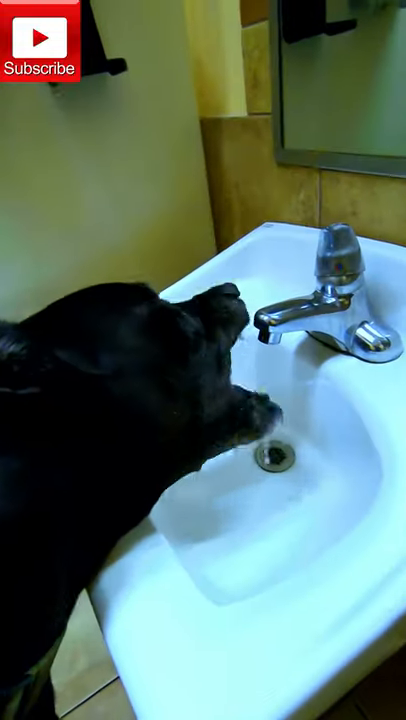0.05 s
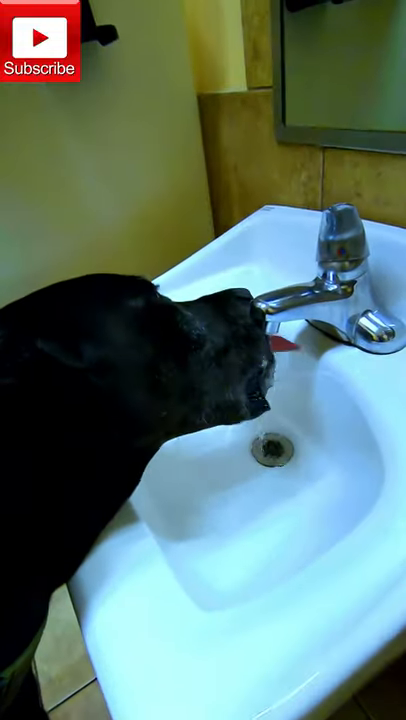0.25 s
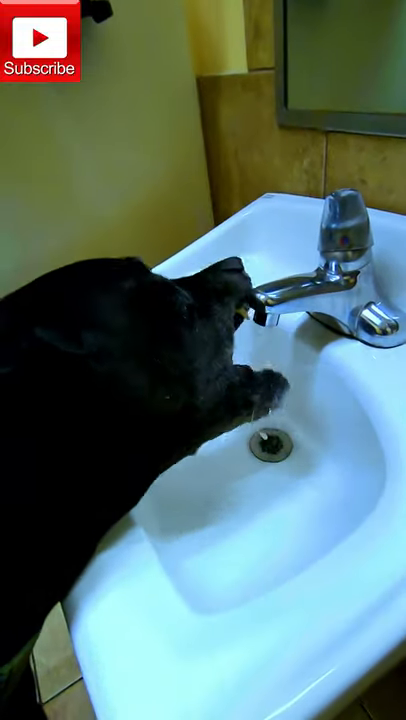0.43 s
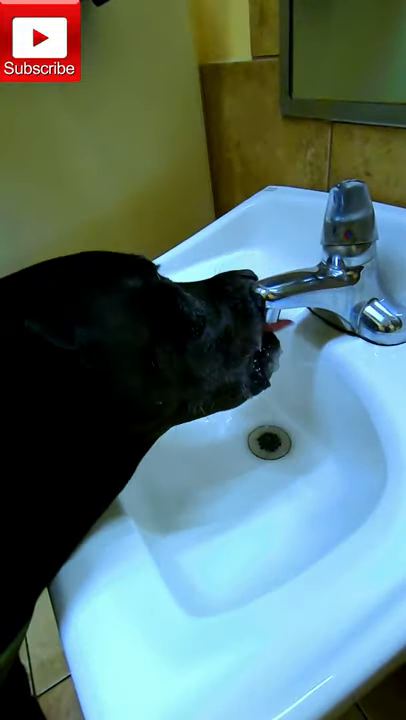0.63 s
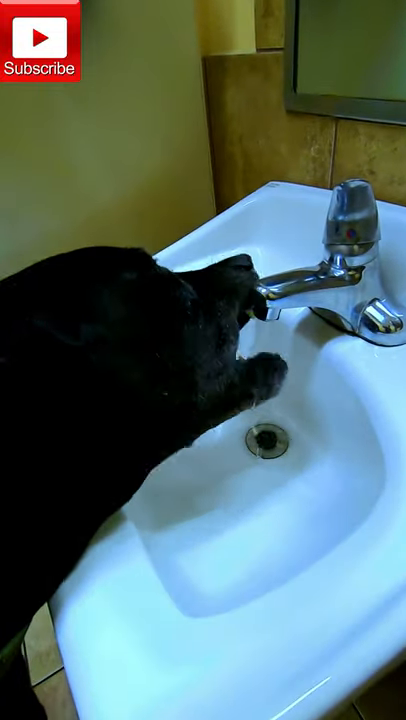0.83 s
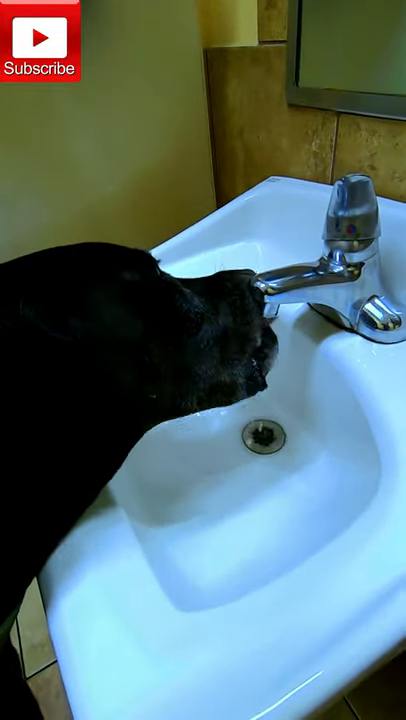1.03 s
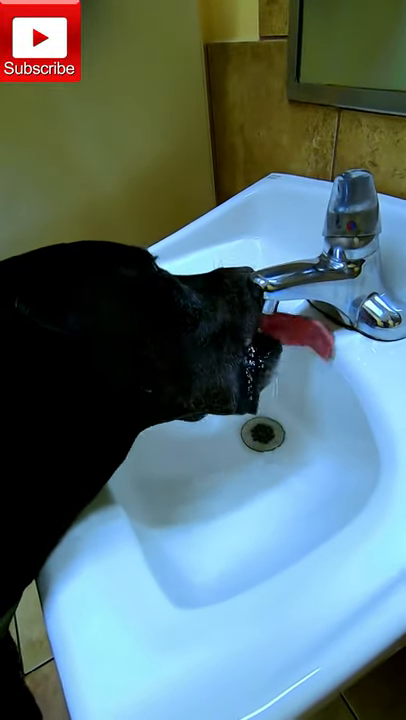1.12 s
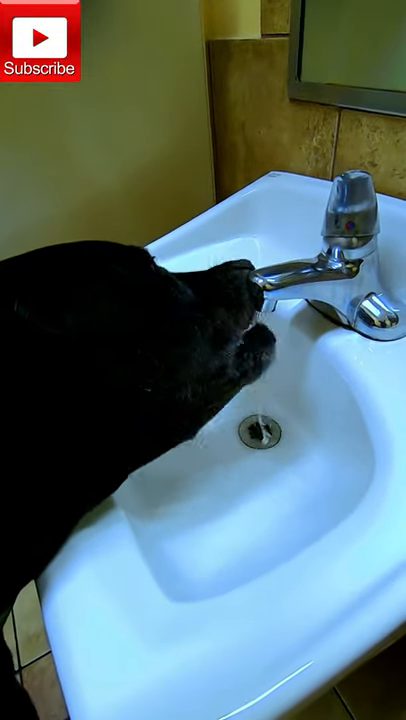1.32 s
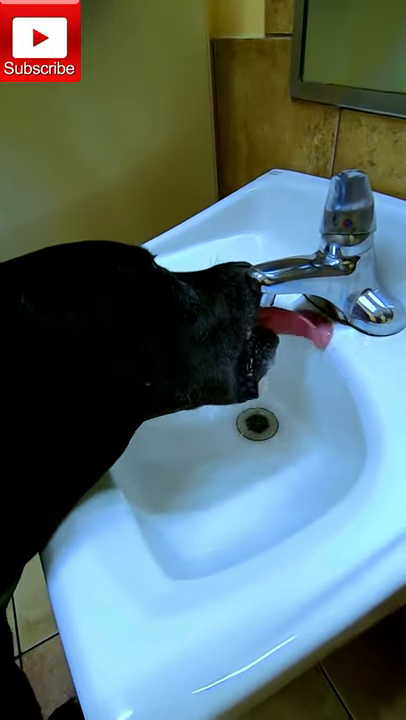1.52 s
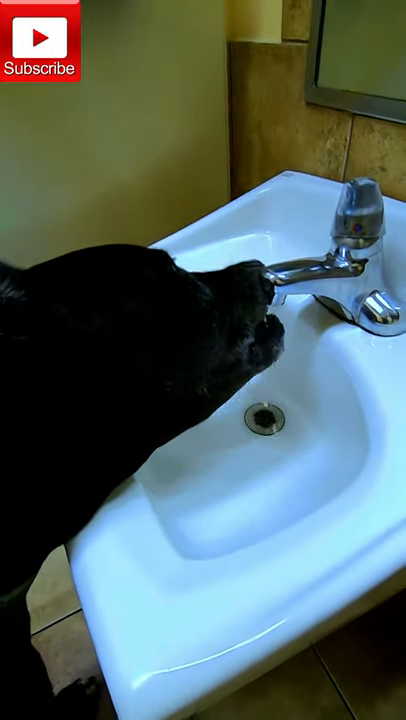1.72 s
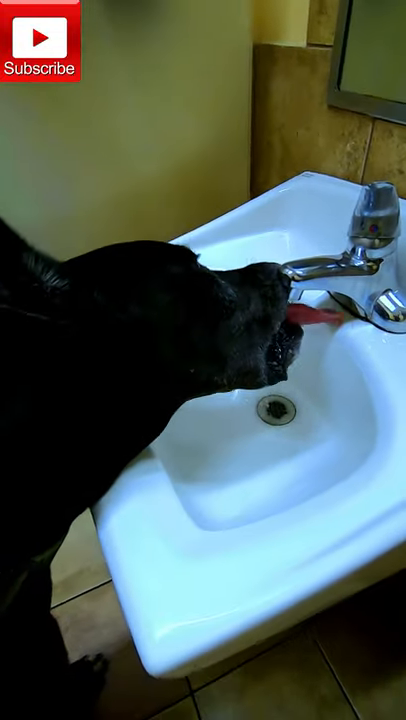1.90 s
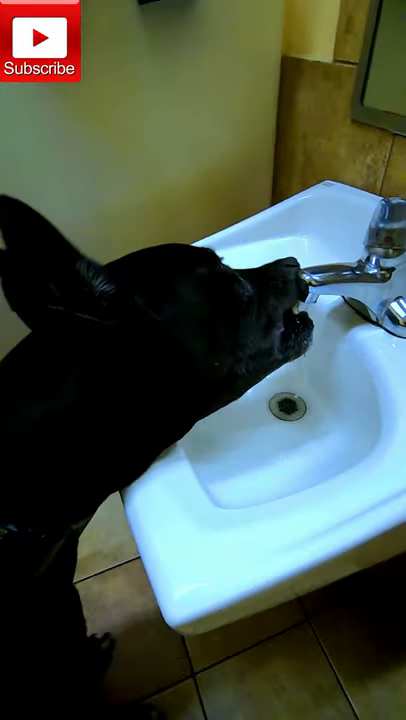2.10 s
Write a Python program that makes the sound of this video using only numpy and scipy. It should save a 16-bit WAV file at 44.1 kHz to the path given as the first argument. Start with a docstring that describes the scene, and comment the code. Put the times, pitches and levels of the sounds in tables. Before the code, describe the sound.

Close, wet lapping as a dog drinks at a sink: five quick slurps with tongue smacks, crackling bubbles and one hollow gulp early on. The basin and tiled bathroom ring briefly over a faint low hum.

```python
"""A dog lapping at a washbasin

A dog laps five times from a faucet in a small tiled bathroom. In each lap the tongue breaks the
water into a fizzy spray while tiny bubbles crackle in the mouth. Tongue and lips smack, larger
bubbles pop, the jaw knocks softly, and the second lap has a hollow gulp.
The basin and the room ring after these sounds, over a low drone and faint airy noise."""
import sys
import numpy as np
from scipy import signal
from scipy.fft import rfft, irfft
from scipy.io import wavfile

SR = 44100
rng = np.random.default_rng(int(sys.argv[2]) if len(sys.argv) > 2 else 0)


def waveform_to_disk(signal):
    """Save audio, clipped to [-1, 1], as 16-bit WAV at the path in sys.argv[1]."""
    frames = np.transpose(np.atleast_2d(signal))
    scaled = np.clip(frames, -1, 1) * 32767
    samples = np.round(scaled).astype(np.int16)
    wavfile.write(sys.argv[1], SR, samples)


N = 94815
TIME = np.arange(N) / SR

# tone of the steady background noise: pitch_hz, gain_db
AIR_TONE = [(25, -6), (60, -1), (150, -9.5), (300, -9), (600, 8), (1200, -12), (3000, -11.5), (6000, -18),
            (9000, -18), (15000, -19)]
# low notes the room drones on: pitch_hz, width_hz, level_db
DRONE_NOTES = [(125.5, 12.7, -10), (155.6, 8.9, -13), (186.3, 5.9, -5), (208.4, 31.6, -3), (241.7, 7.3, -7),
               (313.3, 20, -13), (356.8, 13.3, -12.5), (411.2, 12, -15)]
# how the drone grows and fades: time_s, gain_db
DRONE_LOUDNESS = [(0.0, -65.5), (0.29, -47.5), (0.5, -54), (0.63, -42.5), (0.8, -47.5), (0.82, -50.5),
                  (1.3, -44.5), (1.51, -57.5), (1.92, -50), (2.11, -58.5), (2.15, -51.5)]
# deeper notes that make a rumble: pitch_hz, width_hz, level_db
RUMBLE_NOTES = [(38, 15, -6), (58, 14, -1), (83, 48, -14.5), (119.8, 9.8, 4)]
# how the rumble grows and fades: time_s, gain_db
RUMBLE_LOUDNESS = [(0, -63.5), (.15, -88.5), (.3, -63.5), (.6, -60), (.86, -62.5), (0.969, -59.5),
                   (1.15, -55), (1.33, -49.5), (1.55, -61.5), (1.85, -55.5), (1.97, -65.5), (2.15, -63)]
# time the room's echo takes to fade by 60 dB: pitch_hz, fade_s
ECHO_FADE = [(150, 0.32), (400, 0.34), (1000, 0.67), (3000, 0.29), (7000, 0.2), (14000, 0.44)]
# tone of that echo: pitch_hz, gain_db
ECHO_TONE = [(150, -11), (400, -2.5), (1000, -1), (2000, 0), (3000, 2), (5000, -3.5), (8000, 2),
             (14000, -1)]
# how much echo and air spread out to left and right: pitch_hz, gain_db
STEREO_SPREAD = [(150, -65), (350, -43), (1500, -50), (3000, -46.5), (6000, -27), (10000, -23),
                 (13000, -1.5)]
# notes the basin rings at: pitch_hz, width_hz, gain_db
BASIN_NOTES = [(374, 33, 4), (417, 4, 9.5), (508, 6.7, 10), (711, 24, -14), (1174, 17, 11.5), (1310, 23, 7),
               (1408, 41, 2), (1433, 31, -3), (2547, 60, -2), (2880, 75, -3), (2950, 52, 4.5)]
# larger bubbles: start_s, peak_db, pitch_hz, decay_s
BUBBLE_POPS = [(0.188, -40, 4430, 0.0025), (0.308, -40, 2472, 0.0038), (0.5312, -32.5, 4460, 0.0023),
               (.585, -39.5, 1992, 0.008), (.675, -34.5, 2040, 0.0048), (0.9357, -31.5, 2616, 0.015),
               (0.955, -33, 3290, 0.0022), (1.0008, -29, 1320, 0.0066), (1.0064, -27.5, 1430, 0.0036),
               (1.0128, -34.5, 1416, 0.0055), (1.038, -36.5, 1400, 0.0031), (1.203, -34, 2984, 0.0079),
               (1.2862, -41.5, 2620, 0.0014), (1.4081, -26.5, 1885, 0.0028), (1.424, -31, 2950, 0.0017),
               (1.435, -35.5, 1192, 0.0082), (1.5537, -26.5, 2995, 0.00081), (1.608, -37.5, 2930, 0.0024),
               (1.6521, -48, 2950, 0.0021), (1.808, -44.5, 1153, 0.0038), (1.86, -39, 2203, 0.0047)]
# notes of the hollow mouth in the gulp: pitch_hz, peak_db, decay_s
GULP_NOTES = [(374, -43, 0.038), (444, -41, 0.037), (535, -38, .035), (575, -36.5, 0.026),
              (763, -30.5, 0.041)]
# knocks of jaw and jowls: start_s, peak_db, pitch_hz, width_octaves, decay_s
JAW_KNOCKS = [(.273, -36, 229, 1.1, 0.0033), (.29, -47.5, 683, 0.76, 0.056), (.581, -43, 494, 1, 0.0042),
              (.596, -25, 504, 1.33, 0.0085), (.645, -45, 187, 0.7, 0.013), (.686, -45, 200, 0.55, 0.0045),
              (.701, -34, 443, 2.45, 0.017), (.985, -36, 604, 1.1, 0.017), (1.197, -33, 480, 1.41, 0.014),
              (1.310, -35.5, 182.4, 0.57, 0.0043)]
# smacks of tongue, lips and spattering water: start_s, peak_db, pitch_hz, width_octaves, decay_s
WET_SMACKS = [(.001, -56, 1100, 1.55, 0.025), (.007, -44, 7800, .25, 0.0013),
              (.054, -53, 8700, 0.19, 0.0015), (.129, -51, 4580, 0.36, 0.012),
              (.187, -42.5, 3380, 0.51, 0.0041), (.194, -38, 5470, 0.73, 0.0026),
              (.2045, -28, 3110, 0.38, 0.0073), (.207, -28, 1130, 1.62, .011),
              (.2095, -28.5, 6140, 0.35, 0.0022), (.336, -35.5, 5800, 0.39, 0.0053),
              (.333, -40.5, 1620, 1, 0.017), (.484, -43.5, 4070, 0.92, 0.009), (.524, -49, 7500, 1, .02),
              (.583, -26, 3960, 1.4, 0.0025), (.5975, -21, 3070, 2.1, 0.003),
              (.605, -26, 1080, 1.95, 0.006), (.699, -29, 3560, 0.69, 0.0024),
              (.739, -37.5, 2020, 2, 0.0027), (.747, -40.5, 1574, 0.38, 0.029),
              (.7985, -29.5, 3290, 0.67, 0.0022), (.856, -51, 4200, 0.3, 0.0031),
              (.9075, -36.5, 3550, 1.5, 0.0059), (.934, -24, 4630, 1.45, 0.0039),
              (.959, -38, 4640, 0.39, 0.0017), (.968, -28.5, 1670, 1.73, 0.0057),
              (.9838, -14, 1950, 1.37, 0.001), (1.081, -28, 3700, 0.61, 0.0036),
              (1.118, -23.5, 2250, 1.2, 0.0012), (1.1265, -23.5, 2870, 1.26, 0.0045),
              (1.189, -29, 1480, 2.62, 0.0087), (1.213, -33.5, 4340, 0.32, 0.0043),
              (1.221, -22.5, 3800, 0.92, 0.00097), (1.2215, -30.5, 8900, 0.87, 0.0019),
              (1.304, -43.5, 2870, 0.66, 0.0025), (1.3425, -31.5, 7530, 0.33, 0.0044),
              (1.355, -39, 3100, 2.6, 0.0089), (1.396, -37.5, 5000, 0.29, 0.005),
              (1.430, -28.5, 4900, 1.47, 0.0039), (1.432, -27.5, 2120, 1.33, 0.0087),
              (1.497, -36, 2520, 1.96, 0.009), (1.5615, -28.5, 8220, 1.3, 0.0019),
              (1.591, -36.5, 3350, 1.2, 0.0035), (1.609, -36.5, 3500, 0.83, 0.0027),
              (1.764, -43, 1370, 2.55, 0.048), (1.8045, -34.5, 2970, 1.4, 0.0097),
              (1.829, -37, 2980, 0.33, 0.016), (1.8805, -33.5, 5940, 0.64, 0.0025),
              (1.964, -31.5, 3250, 0.95, 0.0036), (2.031, -50, 2880, 0.44, 0.0026),
              (2.1425, -37.5, 3270, 0.62, 0.0014)]
# strength of the tiny mouth bubbles by pitch: pitch_hz, gain_db
SQUELCH_TONE = [(400, -18.5), (800, -4.5), (1300, -6), (2000, -2), (3000, -6.5), (4500, 0.5), (6000, -1),
                (9000, -31)]
# laps of the tongue (mist is measured against the spray):
# peak_s, squelch_db, spray_db, spray_early_s, spray_hz, squelch_decay_s, mist_db
TONGUE_LAPS = [(0.212, -48, -50, 0.015, 5650, 0.075, -15), (0.602, -45.5, -45, 0.08, 8060, 0.09, -9.5),
               (0.983, -41.5, -48, 0.047, 6640, 0.12, 7), (1.433, -46, -50, 0.09, 7400, 0.055, -4),
               (1.828, -54.5, -52, 0.013, 6500, 0.16, -5)]
# how the microphone dulls the high pitches: pitch_hz, gain_db
MICROPHONE_TONE = [(30, -1.5), (4000, -1.5), (7000, -7), (10000, -2.5), (11500, -13), (14000, -10.5),
                   (16000, -24)]


def from_db(db):
    """Turn decibels into a number to multiply by."""
    return 10 ** (np.asarray(db) / 20)


def rms_one(x):
    """Scale a sound to an average (RMS) strength of 1."""
    return x / np.sqrt(np.mean(x ** 2) + 1e-20)


def at_hz(points, hz):
    """Read between the rows of a table, with octaves evenly spaced."""
    pitches, values = np.transpose(points)
    return np.interp(np.log(np.maximum(hz, 1)), np.log(pitches), values)


def colour(x, tone):
    """Turn each pitch up or down as a tone table says."""
    size = 2 * N
    gain = from_db(at_hz(tone, np.fft.rfftfreq(size, 1 / SR)))
    return irfft(rfft(x, size) * gain, size)[..., :N]


def band(x, hz, octaves):
    """Keep the pitches around hz."""
    edges = [hz / 2 ** (octaves / 2), min(hz * 2 ** (octaves / 2), SR / 2 - 1000)]
    return signal.sosfilt(signal.butter(2, edges, "band", fs=SR, output="sos"), x + 1e-18)


def resonate(x, hz, width_hz):
    """Ring at one pitch; a narrower width rings longer."""
    r = np.exp(-np.pi * width_hz / SR)
    feedback = [1, -2 * r * np.cos(2 * np.pi * hz / SR), r * r]
    return signal.lfilter(np.array([1, 0, -1]) * (1 - r * r) / 2, feedback, x + 1e-18)


def soft_ring(x, hz, width_hz):
    """Two wider rings in a row give a note with a rounded start."""
    return resonate(resonate(x, hz, 2 * width_hz), hz, 2 * width_hz)


def add(out, start_s, x):
    """Mix a sound in at a given time."""
    i = max(int(start_s * SR), 0)
    out[i:i + len(x)] += x[:max(N - i, 0)]


def swell(peak_s, rise_s, decay_s):
    """A loudness curve that climbs to a peak, then dies away."""
    return np.exp(-np.maximum((peak_s - TIME) / rise_s, (TIME - peak_s) / decay_s))


def pings(pitches, per_s, spread_db, sharpness):
    """Uneven random clicks each ring at one pitch, longer if sharper; one row per pitch."""
    sizes = from_db(spread_db * np.minimum(rng.exponential(1, N), 3))
    clicks = (rng.random(N) < per_s / SR) * sizes * rng.choice([-1, 1], N)
    row = rng.integers(0, len(pitches), N)
    return np.array([rms_one(soft_ring(clicks * (row == k), hz, hz / sharpness))
                     for k, hz in enumerate(pitches)])


def room_air():
    """Faint, steady background noise."""
    return from_db(-66.5) * rms_one(colour(rng.standard_normal(N), AIR_TONE))


def drone(notes, loudness):
    """Noise rings at the room's low notes and wavers in level."""
    out = np.zeros(N)
    for hz, width_hz, db in notes:
        note = soft_ring(rng.standard_normal(N + SR), hz, width_hz)[SR:]  # skip the build-up
        out += from_db(db) * rms_one(note)
    return out * from_db(np.interp(TIME, *np.transpose(loudness)))


def bathroom(x, gain_db=-2.5, rise_s=0.0013):
    """Sound bounces off the tiles and blurs into an echo that lasts longest in the middle pitches."""
    t, echo = TIME[:SR], 0
    noise = rng.standard_normal((2, SR)) / np.sqrt(SR)
    for k, hz in enumerate(125 * 2 ** (np.arange(15) / 2)):  # half-octave steps
        rate = np.log(1000) / at_hz(ECHO_FADE, hz)
        fade = np.sqrt(2 * rate) * np.exp(-rate * t)  # same energy whether long or short
        echo += from_db(at_hz(ECHO_TONE, hz)) * fade * band(noise[k % 2], hz, 0.52)
    echo *= 1 - np.exp(-t / rise_s)
    return from_db(gain_db) * signal.fftconvolve(x, echo)[:N]


def basin(x):
    """The bowl rings along with the sounds above it."""
    return sum(from_db(db) * resonate(x, hz, width_hz) for hz, width_hz, db in BASIN_NOTES)


def bubbles(rise_s=0.001, pitch_climb=0.0268):
    """Larger bubbles ring briefly; their pitch climbs by a small share in each decay time."""
    out, t = np.zeros(N), TIME[:SR // 10]
    for start_s, db, hz, decay_s in BUBBLE_POPS:
        shape = (1 - np.exp(-(t / rise_s) ** 2)) * np.exp(-t / decay_s)
        phase = 2 * np.pi * hz * t * (1 + pitch_climb * t / decay_s / 2)
        add(out, start_s, from_db(db) * shape / shape.max() * np.sin(phase))
    return out


def gulp(start_s=0.599):
    """The hollow of the mouth rings briefly as it closes on the water."""
    out, t = np.zeros(N), TIME[:SR // 2]
    for k, (hz, db, decay_s) in enumerate(GULP_NOTES):
        note = from_db(db) * np.exp(-t / decay_s) * np.sin(2 * np.pi * hz * t)
        add(out, start_s, (-1) ** k * note)  # every other note is flipped
    return out


def mouth_contacts(rows, snap_s=0.001494, pops_per_s=500, ragged_db=3.5):
    """Wet flesh meets or parts: a soft snap and a quickly dying crackle, shaped by the mouth."""
    out, t = np.zeros(N), TIME[:SR // 10]
    for start_s, db, hz, octaves, decay_s in rows:
        noise, pops = rng.standard_normal((2, len(t)))
        flutter = np.interp(t * pops_per_s, np.arange(len(t)), pops)
        crackle = noise * from_db(ragged_db * np.tanh(flutter))  # breaks up into tiny pops
        rise_s = snap_s + 0.28 * decay_s  # longer sounds also swell more slowly
        push = crackle * (1 - np.exp(-(t / rise_s) ** 2)) * np.exp(-t / decay_s)
        push[int(snap_s * SR)] += 1.78  # the snap
        burst = band(push, hz, octaves)
        burst = band(burst, hz, 1.5 * octaves)  # the mouth cuts off pitches farther out
        add(out, start_s, from_db(db) * burst / np.abs(burst).max())
    return out


def spray(width_octaves=0.42):
    """The tongue breaks the stream into a fizz of separate droplets."""
    out, pitches = np.zeros(N), np.geomspace(3000, 15000, 28)
    drops = pings(pitches, per_s=2000, spread_db=3, sharpness=17)
    for peak_s, _, db, early_s, hz, _, mist_db in TONGUE_LAPS:
        near_pitch = np.exp(-(np.log2(pitches / hz) / width_octaves) ** 2)
        fizz = rms_one((near_pitch + from_db(mist_db)) @ drops)  # fine mist covers all the pitches
        out += from_db(db) * swell(peak_s - early_s, rise_s=0.013, decay_s=0.09) * fizz
    return out


def squelch(rise_s=0.036):
    """Tiny bubbles burst in the mouth through each lap."""
    loudness = sum(from_db(db) * swell(peak_s, rise_s, decay_s)
                   for peak_s, db, _, _, _, decay_s, _ in TONGUE_LAPS)
    pitches = np.geomspace(450, 9000, 40)
    bursts = pings(pitches, per_s=900, spread_db=5.5, sharpness=11.1)
    return loudness * rms_one(from_db(at_hz(SQUELCH_TONE, pitches)) @ bursts)


def scene():
    """The dog at the basin, in the room; left and right sound nearly the same."""
    dog = squelch() + spray() + mouth_contacts(WET_SMACKS) + mouth_contacts(JAW_KNOCKS)
    dog += gulp() + bubbles()
    air = room_air()
    middle = dog + basin(dog) + bathroom(dog) + air
    middle += drone(DRONE_NOTES, DRONE_LOUDNESS) + drone(RUMBLE_NOTES, RUMBLE_LOUDNESS)
    side = colour(bathroom(dog) + air, STEREO_SPREAD)
    return np.array([middle + side, middle - side])


def record(dry):
    """The microphone adds faint hiss, dulls the highs and cuts off steeply above 15800 Hz."""
    hiss = from_db(-88) * rng.standard_normal((2, N))
    heard = colour(dry + hiss, MICROPHONE_TONE)
    return signal.sosfilt(signal.ellip(10, .1, 80, 15800, fs=SR, output="sos"), heard)


dry = scene()
out = record(dry)
waveform_to_disk(out)
```